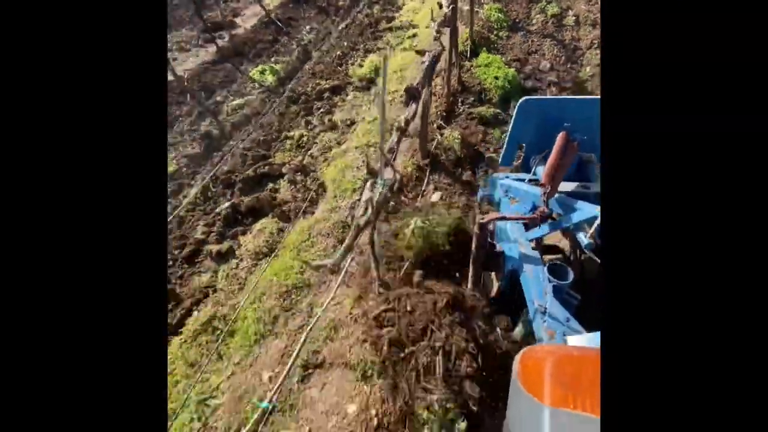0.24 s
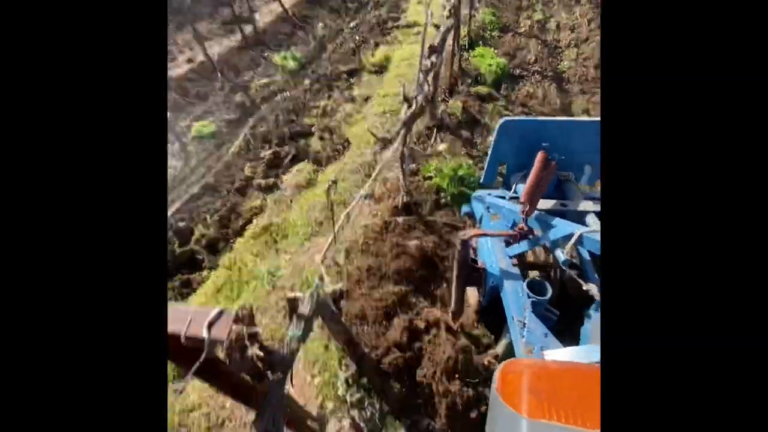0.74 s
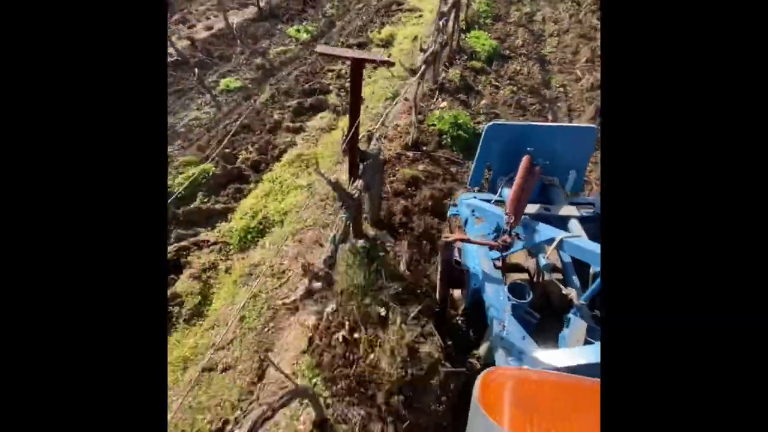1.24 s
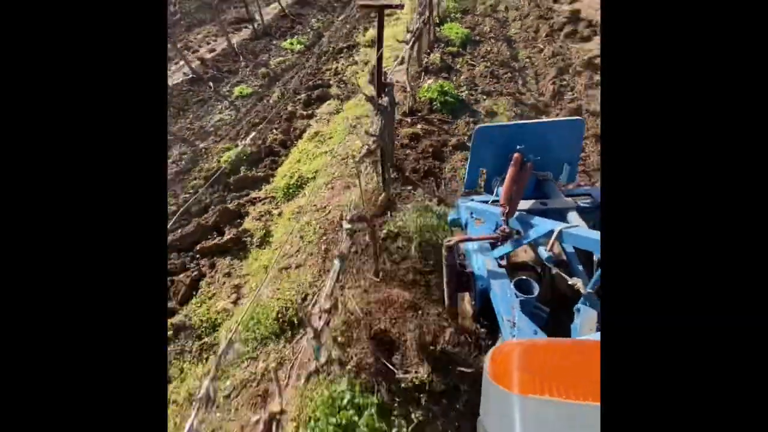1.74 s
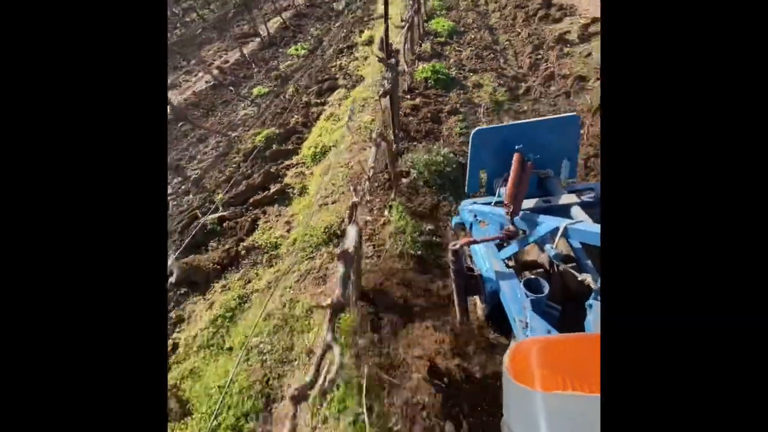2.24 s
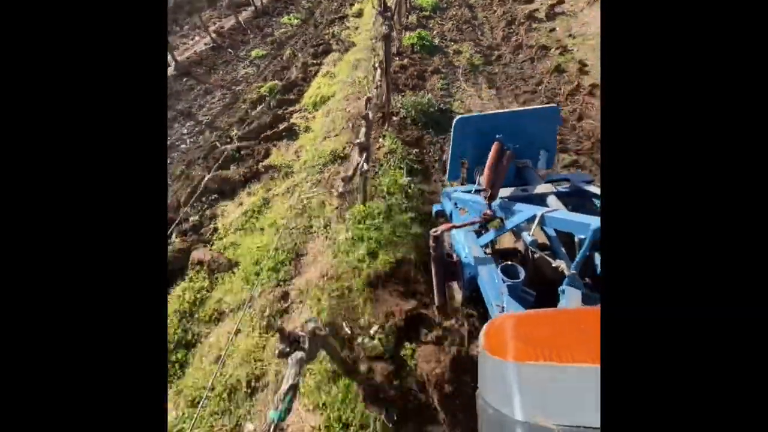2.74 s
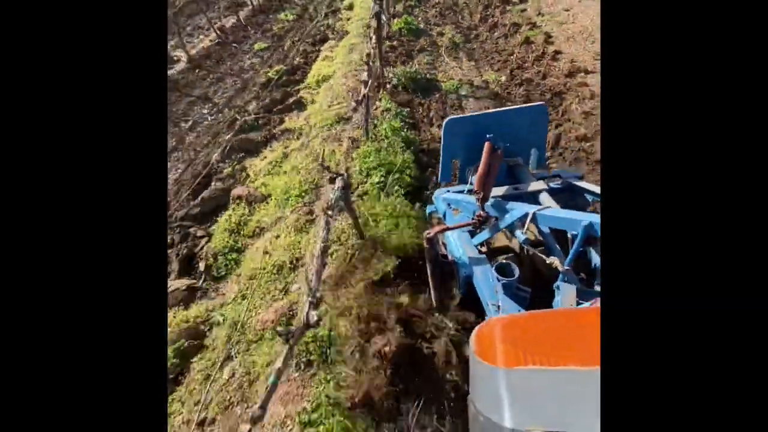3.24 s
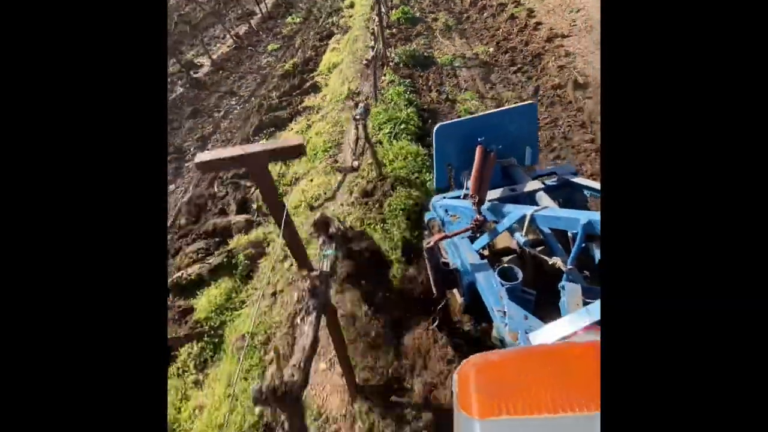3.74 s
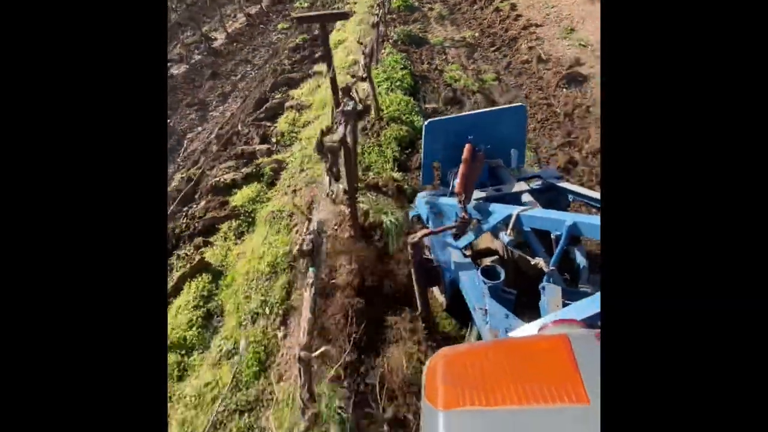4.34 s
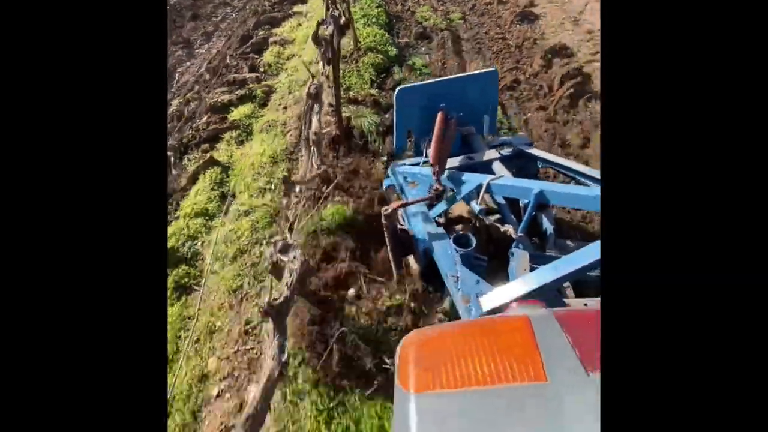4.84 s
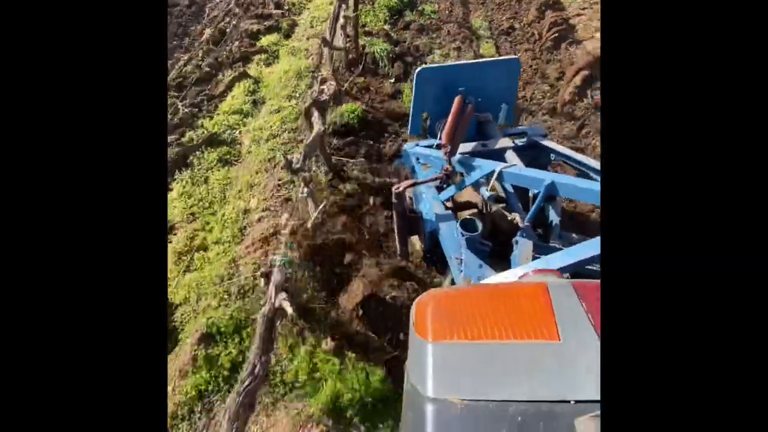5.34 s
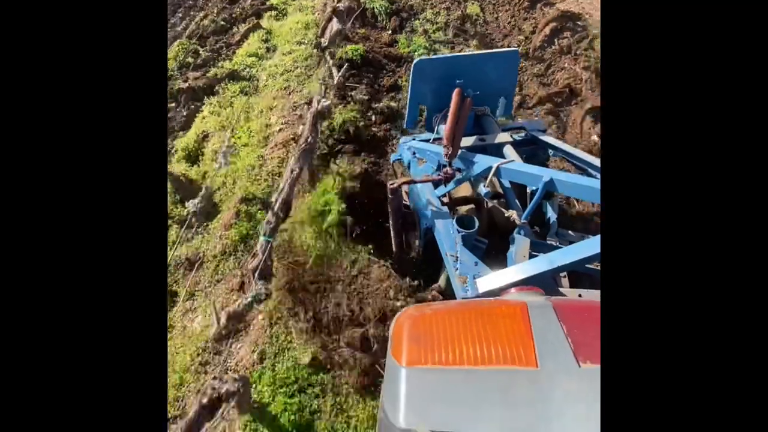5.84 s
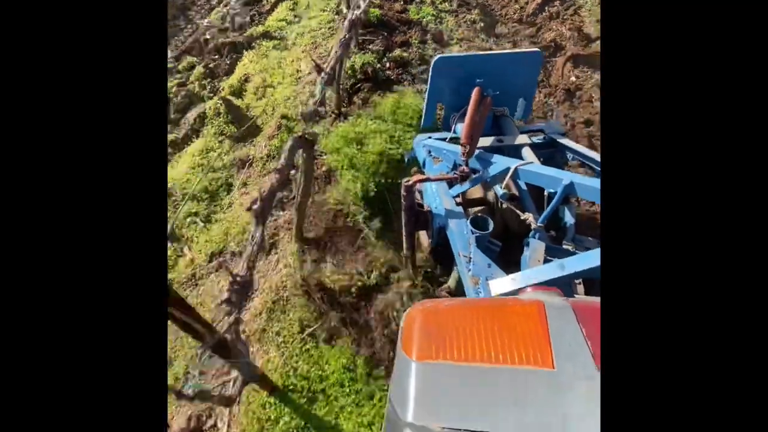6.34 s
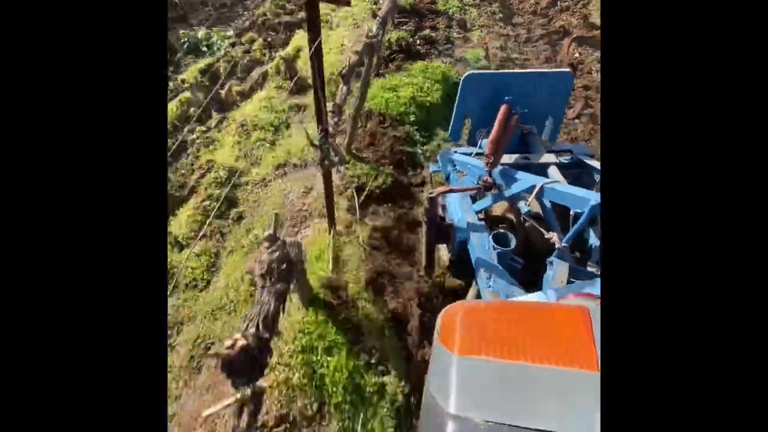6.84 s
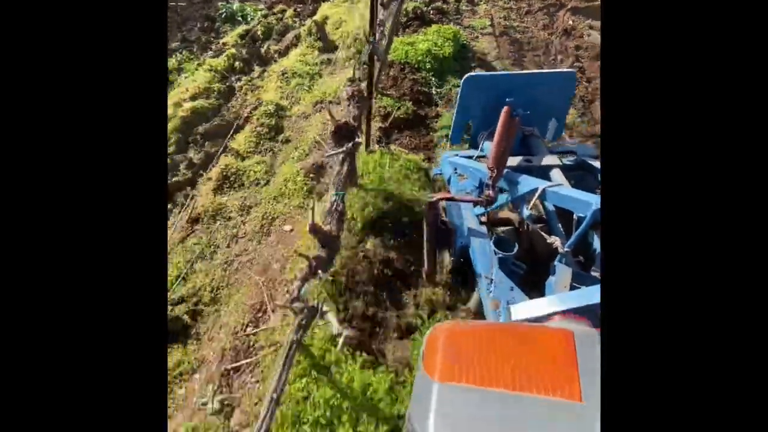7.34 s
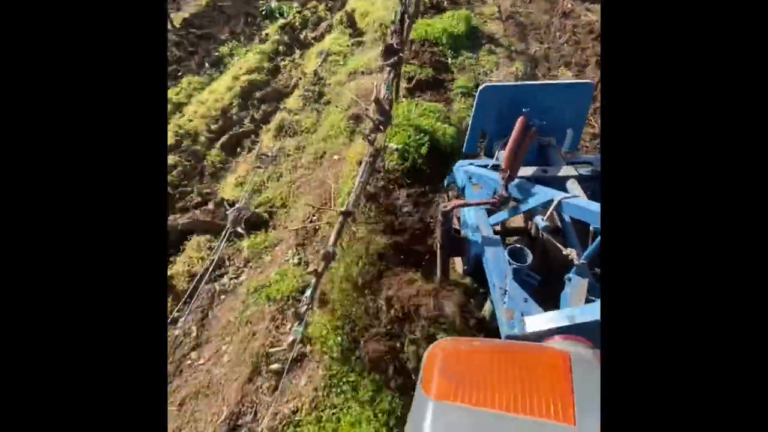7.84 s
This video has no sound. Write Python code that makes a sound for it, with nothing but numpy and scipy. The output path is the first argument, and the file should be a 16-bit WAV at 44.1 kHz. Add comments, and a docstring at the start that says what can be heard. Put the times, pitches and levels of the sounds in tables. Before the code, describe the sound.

A diesel tractor drones and clatters at steady working speed, dragging a harrow through hissing soil with dry metal squeaks, clanks and stone ticks.

```python
"""A three-cylinder diesel tractor at working speed, heard from the seat: crank-locked tones over injector clatter.
It pulls a disc harrow along a vine row. Dry joints squeak as stick-slip tones and the frame clanks in its modes.
Stones tick, clods tumble, and soil hisses off the discs as coloured noise, louder where a disc scrapes.
Just past halfway the listener turns: the engine's colour and direction change."""
import sys
import numpy as np
from scipy import signal
from scipy.fft import rfft, irfft, next_fast_len
from scipy.io import wavfile
from scipy.ndimage import uniform_filter1d, map_coordinates

SR = 44100
rng = np.random.default_rng(int(sys.argv[2]) if len(sys.argv) > 2 else 0)


def file_out(sig):
    """Save sig as 16-bit WAV at sys.argv[1]."""
    # one column per channel
    cols = np.atleast_2d(sig).T
    # limit, then scale
    lim = np.clip(cols, -1, 1)
    pcm = np.round(lim * 32767).astype(np.int16)
    wavfile.write(sys.argv[1], SR, pcm)


N = 356006

# Engine held at working speed, sagging under load and picking up as it eases: (time [s], rate [cycles/s])
CYCLE_RATE = [(0.0, 21.56), (0.2, 21.43), (0.44, 21.5), (1.2, 21.39), (1.44, 21.61), (1.64, 21.47),
              (1.76, 21.54), (1.92, 21.44), (2.12, 21.5), (2.32, 21.42), (2.48, 21.46), (2.64, 21.38),
              (2.92, 21.44), (3.2, 21.2), (3.4, 21.4), (3.72, 21.52), (3.96, 21.36), (4.36, 21.31),
              (4.68, 21.64), (4.88, 21.66), (5.04, 21.73), (5.4, 21.86), (5.72, 21.67), (6.12, 21.78),
              (6.44, 21.63), (6.6, 21.73), (7.04, 21.72), (7.4, 21.92), (7.56, 21.79), (7.72, 21.89),
              (7.88, 21.72), (8.04, 21.72)]
# Engine tones, three firings a cycle: (multiple of cycle rate, level before turn [dB], after [dB])
ENGINE_ORDERS = [(2, -39.5, -36), (3, -21, -19), (4, -33.5, -36.5), (5, -38.5, -46), (6, -35, -32.5),
                 (7, -30, -29.5), (8, -42, -40), (9, -34, -37), (10, -42, -40), (12, -32, -36.5),
                 (13, -40, -48), (14.2, -38, -37), (15, -36, -32), (18, -35.5, -34.5), (19, -42.5, -39),
                 (21, -37, -40), (24, -38.5, -35), (25, -39.5, -36.5), (26, -36.5, -30.5), (27, -37.5, -38),
                 (30, -32.5, -31.5), (32, -39.5, -43), (33, -43, -45), (38, -42.5, -35.5), (40, -44, -47),
                 (45, -40, -33), (52, -52, -40.5), (56, -53, -43), (60, -46, -39), (75, -47, -46),
                 (84, -46, -44), (90, -45.5, -46)]
# Swell of the boom near 150 Hz: (time [s], gain [dB])
BOOM_SWELL = [(0, 0), (1.2, -1.5), (1.6, 2), (2.1, -1.5), (2.6, 2), (3.2, -0.5), (4.2, 0.5), (4.55, 4.5),
              (5, -1.5), (5.5, 1.5), (8.07, 0)]
# Swell of the whine near 645 Hz: (time [s], gain [dB])
WHINE_SWELL = [(0, -2), (.5, 2), (1.1, -10.5), (1.8, -4.5), (2.15, 3.5), (2.7, 1), (3.1, 3), (4, -0.5),
               (4.6, -5), (5.5, -0.5)]
# Engine's mechanical noise: (frequency [Hz], density before turn [dB/Hz], after [dB/Hz]), before trim
ENGINE_ROAR = [(20, -79, -78), (30, -72, -67), (45, -57, -51), (116.3, -45.5, -45), (173.4, -49, -48),
               (300, -51, -50), (555, -54, -49), (736, -56, -53), (955, -58, -55.5), (1128, -57, -57.5),
               (1815, -67.5, -62), (2558, -65.5, -69), (4370, -72, -76), (7480, -79.5, -77.5),
               (8980, -108, -108)]
# Engine cover resonances: (frequency [Hz], width [Hz], lift before turn [dB], after [dB])
COVER_MODES = [(960, 73, 5, 1.5), (1313.8, 18, 2.5, 9), (1590, 55, 2.5, 3), (1927.3, 77, 4.5, 5.5),
               (2225, 90, 1, 0.5)]
# Listener's stance, 0 before the turn, 1 turned furthest, 2 settled (clipped to 0-2): (time [s], stance)
LISTENER_TURN = [(0, 0.121), (4.55, 0.085), (4.92, 0.907), (5.2, 1.13), (5.6, 1.887), (8.07, 2.6)]
# Engine is fuller when faced: (frequency [Hz], gain [dB])
FACING_LIFT = [(100, -0.5), (200, 1.5), (400, 3), (620, -1.5), (900, 3), (1400, -1.5), (2200, -1)]
# Engine direction: (frequency [Hz], left lead in stance 0 [rad], 1 [rad], 2 [rad], coherence [0-1])
ENGINE_BEARING = [(60, 0, -.25, -.15, .97), (170, 0, -1.2, -.25, .93), (250, -.05, -1.7, -.6, .92),
                  (430, -.3, -2.5, -1.6, .85), (600, -1, -3, -2.4, .86), (950, -1.4, -3.3, -2.8, .62),
                  (1650, -6, -4.4, -4.2, .62), (2000, -5.7, -4.7, -4.6, .7), (2800, -3.3, -3.8, -3.8, .5),
                  (7000, -4.1, -4.1, -4.2, .6)]
# Engine coherence while faced: (frequency [Hz], coherence [0-1])
FACING_COHERENCE = [(300, 0.93), (650, 1), (1100, 0.72), (2000, 0.34), (7000, 0.4)]
# Dry joints: (time [s], length [s], pitch [Hz], pitch fall over length [share],
# level [dB], second partial re first [dB])
JOINT_SQUEAKS = [(0.872, 0.0256, 3884, 0, -24.5, -9.5), (0.899, 0.0284, 3840, 0.0125, -28, -17),
                 (1.992, 0.0287, 4968, 0.022, -23.5, -8), (2.02, 0.0293, 4785, 0.0041, -24.5, -12.5),
                 (2.052, 0.0343, 4720, 0.023, -15.5, -21.5), (2.238, 0.096, 3900, 0.0051, -38, -15),
                 (2.492, 0.0363, 4803, 0.021, -9.5, -15), (2.535, 0.0215, 4682, .01, -20, -19),
                 (3.774, 0.0366, 3889, 0.016, -30.5, -9), (3.811, 0.027, 3907, -0.0044, -26.5, -17.5),
                 (3.989, 0.041, 3865, 0.00094, -23.5, -12.5), (4.014, 0.0293, 3861, -0.0057, -15.5, -17),
                 (4.038, .02, 3820, 0.0135, -25, -21), (4.253, 0.044, 5064, .004, -22, -20.5),
                 (4.283, 0.079, 4980, 0.025, -26, -40), (5.183, 0.0535, 4988, 0.015, -23.5, -12),
                 (5.214, 0.0267, 4906, -0.0085, -19.5, -19.5), (5.223, 0.0159, 1370, -.02, -21.5, -26.5),
                 (5.524, 0.0746, 3860, -0.011, -21.5, -1.5), (5.561, 0.047, 3860, -0.0013, -19.5, -16.5),
                 (7.551, 0.028, 4952, 0.0066, -24.5, -12.5), (7.572, 0.0143, 4830, 0.014, -18, -24),
                 (7.587, 0.0166, 4730, 0.0027, -24, -21.5)]
# Dry pivot: (time [s], length [s], pitch [Hz], pitch fall over length [share], level [dB])
PIVOT_CREAKS = [(1.663, 0.04, 799.2, 0.0103, -21.5), (1.677, 0.0317, 784, 0.011, -16),
                (1.708, 0.019, 765.7, .01, -17.5), (1.726, 0.0122, 770.7, .005, -25.5)]
# Creak partials, one per multiple of the pitch: (relative level [dB])
CREAK_PARTIALS_DB = [-9, 0, -13, -18.5, -24, -28]
# Squeak direction, by partial: (frequency [Hz], left lead [rad], left gain [dB])
JOINT_BEARING = [(800, -1.2, 0), (1550, .2, -1), (3870, 1.7, -1), (4900, 2.4, -5), (7700, 2.3, 0),
                 (9000, np.pi, 0), (11000, np.pi, 0), (12000, 2.5, 0)]
# Blows on the frame: (time [s], level [dB], ring [Hz], ring re body [dB], treble re body [dB],
# chatter [s], decay to -60 dB [s])
FRAME_CLANKS = [(.816, -26.5, 1893, -8, -3.5, .011, .06), (.997, -26, 1601, 1, -14, 0.0072, .1),
                (1.054, -18.5, 1424, 3.5, -21, .006, 0.059), (1.423, -22, 1814, -7.5, -9, .012, .097),
                (2.238, -22, 1493, -0.5, -6.5, 0.0088, .12), (3.016, -24.5, 3280, 4, -0.5, 0.015, 0.11),
                (3.045, -19.5, 3038, 5, -10, .013, 0.05), (3.9795, -11, 2260, 0.5, -19, 0.0072, 0.059),
                (4.099, -21.5, 2168, -2, -9.5, 0.005, 0.084), (4.124, -22, 2313, -3, -7.5, .014, .12),
                (4.15, -19, 2306, 0.5, -16, .004, 0.048), (4.788, -20, 2120, -6.5, -5.5, .01, .091),
                (4.919, -20, 1522, 0, -19, .004, 0.076), (5.919, -22.5, 1920, 3.5, -16.5, .008, 0.066),
                (6.0, -20, 1624, 6.5, -27, .004, .045), (6.049, -13.5, 2013, -1, -8, 0.0102, .05),
                (8.015, -12, 3462, 1.5, -5, 0.0094, .055)]
# Harrow frame modes: (frequency [Hz], mean level [dB])
FRAME_MODES = [(1150, -10), (1450, -3), (1860, -5.5), (2290, -10.5), (2800, -3), (3370, -10.5), (3810, -11),
               (4280, -16)]
# Stones flicked against the discs: (time [s], level before trim [dB], ring [Hz],
# decay to -60 dB [s], ring lift [dB])
STONE_TICKS = [(0.154, -15.5, 5200, .045, 6.5), (0.5196, -18, 6000, .051, 9),
               (.815, -21.5, 5810, 0.044, 11.5), (1.2286, -19, 5995, 0.03, 17),
               (1.8302, -14.5, 5690, .03, 4.5), (2.163, -22.5, 7440, 0.035, 4),
               (2.521, -18.5, 6990, 0.05, 11), (3.045, -17, 6066, 0.085, 23.5),
               (3.744, -21, 7340, .029, 10), (4.0363, -21.5, 7730, .015, 4), (4.347, -20, 7375, .11, 18),
               (6.095, -16, 5610, 0.04, 9.5), (8.016, -18.5, 7280, 0.067, 14)]
# Harrow direction, opposed near 10 kHz: (frequency [Hz], left lead [rad], coherence [0-1])
HARROW_DIRECTION = [(300, -.3, .8), (900, -1.7, .5), (1700, -5.6, .55), (2300, -5.2, .5), (2900, -3.3, .5),
                    (5000, -3.4, .55), (6300, -4.3, .65), (7500, -4, .72), (8400, -np.pi, .96),
                    (9500, -np.pi, 1), (11200, -np.pi, 1), (12500, -3, .65), (13700, -2.4, .5),
                    (15200, -.3, .5)]
# Harrow raised on the right and lowered on the left by: (frequency [Hz], gain [dB])
HARROW_RIGHT_BIAS = [(2000, 0), (4500, 1.4), (6500, 1.1), (8000, 0)]
# Steady soil flow, following disc depth: (time [s], level [dB])
SOIL_FLOW = [(0, -34), (.8, -39.5), (1.6, -42.5), (2.4, -45), (3.5, -49), (3.85, -36.5), (4.8, -41.5),
             (5.75, -45), (6.45, -45.5), (7.1, -42), (8.07, -43)]
# Colour of soil on steel: (frequency [Hz], relative level [dB])
SOIL_COLOUR = [(1000, -9), (3000, -.5), (5000, -1), (7000, 0), (8300, .5), (11500, -.5), (13000, -2.5),
               (15500, -6)]
# Disc resonances: (frequency [Hz], width [Hz], lift [dB])
DISC_MODES = [(3450, 250, 3), (6080, 220, 5), (6900, 300, 2), (7420, 180, 5), (7750, 100, 2)]
# A disc bites into firmer ground: (time [s], rise [s], hold [s], level [dB],
# release to -60 dB [s], fizz above 10 kHz re rub [dB])
DISC_SCRAPES = [(1.161, .02, 0.026, -36.5, 1.5, -10), (2.039, .02, .024, -29, 0.19, -1.5),
                (4.08, 0.018, .018, -39, 5.5, 7.5), (4.299, 0.054, .025, -25, 0.63, 6.5),
                (4.746, .02, .023, -34, 0.54, 2.5), (5.213, .05, 0.116, -29.5, 0.89, 1),
                (5.435, .02, 0.057, -33, 0.02, -5), (7.56, 0.023, 0.024, -30, 1, -3.5)]
# Harder rubbing favours these disc modes: (frequency [Hz], width [Hz], lift [dB])
SCRAPE_MODES = [(6077, 480, 7.5), (7270, 1200, 7), (3300, 890, 0.5)]
# How heavily the clods tumble: (time [s], level [dB])
CLOD_LEVEL = [(0, -36), (1.3, -34.5), (2.95, -36.5), (3.07, -28.5), (3.3, -36), (4.6, -31), (5.4, -33),
              (6.7, -32.5), (7.2, -32.5), (8.07, -30.5)]

BOOM_ORDER, WHINE_ORDER = 7, 30
HUNT_SHARE, HUNT_KNOTS_PER_S = 0.0003, 3.323  # random speed drift
SQUEAK_TAIL_DB, SQUEAK_TAIL_T60_S = -13.5, 0.088
MODE_BLUR_RAD, MODE_DETUNE_SHARE = .6, .005  # phase scatter in a ring; pitch scatter between blows
TOP_HZ = 15900


def crank():
    """Engine cycles turned so far, two revolutions to a cycle."""
    drift = 1 + HUNT_SHARE * wobble(HUNT_KNOTS_PER_S)
    return np.cumsum(curves(CYCLE_RATE)[0] * drift) / SR


def drone(cycle, stances, waver_base_db=0.8, waver_db_per_order=0.07, waver_max_db=3.0):
    """Exhaust and gear tones locked to the crank; higher orders waver and sway more, boom and whine swell."""
    out = np.zeros((2, N))
    shaft_rad = 2 * np.pi * cycle + .004 * wobble(14)
    sway_rad = .01 * wobble(2.5)
    swells_db = {BOOM_ORDER: curves(BOOM_SWELL)[0], WHINE_ORDER: curves(WHINE_SWELL)[0]}
    for order, before_db, after_db in ENGINE_ORDERS:
        mean_hz = order * cycle[-1] * SR / N
        lead = np.array(along(ENGINE_BEARING, mean_hz)[:-1]) @ stances + order * sway_rad
        faced_db = after_db + along(FACING_LIFT, mean_hz)[0]
        level_db = np.array([before_db, faced_db, after_db]) @ stances
        waver_db = min(waver_base_db + waver_db_per_order * order, waver_max_db) * wobble(10)
        waver_db = waver_db + swells_db.get(order, 0)
        phase = order * shaft_rad + .003 * order * wobble(18) + rng.uniform(0, 2 * np.pi)
        tone = np.sin([phase + lead / 2, phase - lead / 2])
        out += np.sqrt(2) * amp(level_db + waver_db) * tone
    return out


def clatter(cycle, stances, repeat=0.54, fresh=0.849, limp_db=-0.2341, uneven_db=1.7072, trim_db=-1.0463):
    """Block and injectors rattle the covers: one noise part repeats every cycle, the rest is new."""
    pattern = unit(irfft(np.exp(2j * np.pi * rng.random((2, 1025)))))
    place = cycle % 1 * pattern.shape[1]
    locked = np.array([map_coordinates(p, [place], order=3, mode="grid-wrap") for p in pattern])
    locked_colour = [(200, -26.5), (550, -5.5), (1000, -1.5), (1900, 1.0), (3500, -20.5)]  # (Hz, dB)
    locked = filtered(locked, lambda hz: amp(along(locked_colour, hz)[0]))
    # one slight limp per cycle, plus random unevenness
    force = unit(amp(limp_db * np.cos(2 * np.pi * cycle) + uneven_db * wobble(65)))
    rattle = force * (fresh * rng.standard_normal((2, N)) + repeat * locked)

    def coloured(side):
        covers = [(hz, width, lifts[side]) for hz, width, *lifts in COVER_MODES]
        return filtered(rattle, lambda hz: amp(along(ENGINE_ROAR, hz)[side] + lifted(covers, hz)))

    before, after = coloured(0), coloured(1)
    mixed = after + stances[0] * (before - after)
    density_to_rms = np.sqrt(SR / 2)
    return amp(trim_db) * density_to_rms * turning(mixed, stances, patchy_db=3.0)


def turning(pair, stances, patchy_db):
    """Place noise left and right by phase and coherence as the listener turns; colour shifts in random patches."""
    hz, t, z = signal.stft(pair, SR, nperseg=1024)
    share = stances[:, np.minimum((t * SR).astype(int), N - 1)]
    *leads, alike = along(ENGINE_BEARING, hz)
    lead = np.transpose(leads) @ share
    alike = alike[:, None] + np.outer(along(FACING_COHERENCE, hz)[0] - alike, share[1])
    angle = np.arccos(np.clip(alike, 0, 1)) / 2
    patches = uniform_filter1d(rng.standard_normal(lead.shape), size=6, axis=0)
    patches = unit(uniform_filter1d(patches, size=7, axis=1))
    patch_db = patchy_db * patches * (hz / (hz + 500))[:, None]
    z = z * amp(np.outer(along(FACING_LIFT, hz)[0], share[1]) + patch_db)
    shared, apart = z[0] * np.cos(angle), z[1] * np.sin(angle)
    left = (shared + apart) * np.exp(.5j * lead)
    right = (shared - apart) * np.exp(-.5j * lead)
    return signal.istft([left, right], nperseg=1024)[1][:, :N]


def squeaks():
    """Nearly pure squeaks from the joints, a rougher creak from a pivot; the frame rings on after each."""
    out = np.zeros((2, N))
    for s, length_s, hz, fall, db, second_db in JOINT_SQUEAKS:
        partials_db = db + np.array([0, second_db, second_db - 14])
        add(out, s, slip(length_s, hz, fall, partials_db, rough_db=2.5, pitch_jitter=0.00394))
    for s, length_s, hz, fall, db in PIVOT_CREAKS:
        creak = slip(length_s, hz, fall, CREAK_PARTIALS_DB, rough_db=1.5, pitch_jitter=0.0071)
        add(out, s, amp(db) * creak)
    t = np.arange(SR // 5) / SR
    tail = rng.standard_normal((1, len(t))) * np.exp(-np.log(1000) * t / SQUEAK_TAIL_T60_S)
    tail = unit(tail) / np.sqrt(len(t))  # unit energy
    return out + amp(SQUEAK_TAIL_DB) * signal.fftconvolve(out, tail, axes=1)[:, :N]


def slip(length_s, hz, fall, partials_db, rough_db, pitch_jitter, ring_s=0.00327):
    """Steel sticks and slips at one of its resonances, glides in pitch and rings out."""
    u = np.minimum(np.arange(round((length_s + 10 * ring_s) * SR)) / (length_s * SR), 1)
    pitch_hz = hz * (1 + fall * (.5 - u) + pitch_jitter * wobble(367, size=len(u)))
    phase = 2 * np.pi * np.cumsum(pitch_hz) / SR
    keep = np.exp(-1 / (ring_s * SR))
    swell = signal.lfilter([1 - keep], [1, -keep], np.sin(np.pi * u ** 0.734))
    swell = swell * amp(rough_db * wobble(308.5, size=len(u)))
    tone = 0
    for k, db in enumerate(partials_db, 1):
        lead, left_db = along(JOINT_BEARING, k * hz)
        left = amp(left_db) * np.sin(k * phase + lead)
        tone = tone + amp(db) * np.array([left, np.sin(k * phase)])
    return np.sqrt(2) * swell * tone


def knocks(rise_s=0.00033, mode_scatter_db=5.0, stone_trim_db=-3, stone_width_hz=800):
    """Loose links chatter into the frame's modes, each blow favouring one; stones tick brightly on the discs."""
    out, t = np.zeros((2, N)), np.arange(SR // 4) / SR
    treble_colour = [(1500, -34.5), (4000, 13), (6500, 6.5), (15000, -22)]  # (Hz, dB)

    def burst(response):
        return unit(filtered(rng.standard_normal((2, len(t))), response))

    def bright(f):
        return amp(along(treble_colour, f)[0])

    def mode(hz):
        blur = MODE_BLUR_RAD * wobble(330, size=len(t))
        quadrature = np.array([[0], [np.pi / 2]])
        return np.sqrt(2) * np.sin(2 * np.pi * (hz * t + rng.random()) + blur + quadrature)

    for s, db, ring_hz, ring_db, treble_db, chatter_s, t60_s in FRAME_CLANKS:
        body = np.zeros((2, len(t)))
        for mode_hz, mode_db in FRAME_MODES:
            gain = amp(mode_db + mode_scatter_db * rng.normal())
            body += gain * mode(mode_hz * (1 + MODE_DETUNE_SHARE * rng.normal()))
        envelope = (1 - np.exp(-t / rise_s)) * amp(db - 60 * np.maximum(t - chatter_s, 0) / t60_s)
        blow = unit(body) + amp(ring_db) * mode(ring_hz) + amp(treble_db) * burst(bright)
        add(out, s, envelope * unit(blow))
    for s, db, ring_hz, t60_s, ring_db in STONE_TICKS:
        ring = [(ring_hz, stone_width_hz, ring_db)]
        tick = burst(lambda f: f ** 2 / (f ** 2 + 3000 ** 2) * amp(lifted(ring, f)))
        add(out, s, tick * amp(stone_trim_db + db - 60 * t / max(t60_s, .004)))
    return ports(out, lambda hz: (1, *along(HARROW_DIRECTION, hz)))


def clods(stances, lump_db=2.5):
    """Turned clods tumble against the frame: dull noise in uneven lumps."""
    colour = [(100, -35.0), (350, -2), (800, -5.5), (1300, -6.5), (2400, -10.0), (4000, -20.0),
              (8000, -67.5)]  # (Hz, dB)
    lumps = rng.standard_normal((2, N)) * amp(lump_db * np.tanh(wobble(90)))
    dull = filtered(lumps, lambda hz: amp(along(colour, hz)[0]))
    return amp(curves(CLOD_LEVEL)[0]) * unit(turning(dull, stances, patchy_db=3.5))


def soil(uneven_db=2.4):
    """Earth slides over the discs all the time, and louder wherever one bites."""
    sliding = amp(curves(SOIL_FLOW)[0] + uneven_db * wobble(18))
    rub = earth(DISC_MODES + SCRAPE_MODES, clump_db=3.5, grit=0.34)
    fizz = filtered(rub, lambda hz: hz > 10000)
    rub_gain, fizz_gain = scraping()
    steady = sliding * earth(DISC_MODES, clump_db=2.5, grit=0.45)
    return steady + rub_gain * (rub - fizz) + fizz_gain * fizz


def scraping():
    """Gain of the scrapes and of their fizz: each swells, holds and dies away; powers add."""
    t, power = np.arange(N) / SR, np.zeros((2, N))
    for s, rise_s, hold_s, db, t60_s, fizz_db in DISC_SCRAPES:
        attack = np.clip((t - s) / rise_s, 0, 1)
        released_s = np.maximum(t - s - rise_s - hold_s, 0)
        release = np.exp(-np.log(1000) * released_s / t60_s)
        power += (amp([[db], [db + fizz_db]]) * attack * release) ** 2
    return np.sqrt(power)


def earth(modes, clump_db, grit, grains_per_s=900):
    """Hiss of earth on ringing steel, in clumps, with sharp grains of grit in it; rms 1."""
    struck = rng.random(N) < grains_per_s / SR
    grains = rng.standard_normal((2, N)) * rng.exponential(1, N) * struck
    flow = (rng.standard_normal((2, N)) + grit * unit(grains)) * amp(clump_db * wobble(64))

    def response(hz):
        gain = amp(along(SOIL_COLOUR, hz)[0] + lifted(modes, hz))
        return gain, *along(HARROW_DIRECTION, hz)

    return unit(ports(flow, response))


def lifted(modes, hz):
    """dB that a set of (centre [Hz], width [Hz], lift [dB]) resonances adds."""
    return sum(db / (1 + (2 * (hz - centre) / width) ** 2) for centre, width, db in modes)


def ports(pair, response):
    """Mix two signals to left and right; response gives (gain, left lead [rad], coherence) by frequency."""
    m = next_fast_len(N + 8192)
    gain, lead, alike = response(np.fft.rfftfreq(m, 1 / SR))
    angle = np.arccos(np.clip(alike, 0, 1)) / 2
    shared, apart = rfft(pair, m) * gain * np.array([np.cos(angle), np.sin(angle)])
    left = (shared + apart) * np.exp(.5j * lead)
    right = (shared - apart) * np.exp(-.5j * lead)
    return irfft([left, right], m)[:, :N]


def filtered(x, response):
    """x through a response given as a function of Hz."""
    m = next_fast_len(x.shape[-1] + 8192)
    return irfft(rfft(x, m) * response(np.fft.rfftfreq(m, 1 / SR)), m)[..., :x.shape[-1]]


def wobble(knots_per_s, size=N):
    """A smooth random curve through normally distributed knots."""
    coarse = np.arange(0, size + 64, 64)
    knots = rng.standard_normal(int(size * knots_per_s / SR) + 4)
    smooth = map_coordinates(knots, [coarse * knots_per_s / SR], mode="nearest")
    return np.interp(np.arange(size), coarse, smooth)


def along(rows, hz):
    """Each column of a (Hz, ..) table, read on a log axis."""
    f, *cols = np.transpose(rows)
    return [np.interp(np.log(hz + 1), np.log(f + 1), c) for c in cols]


def curves(rows):
    """Each column of a (s, ..) table, one value per sample."""
    s, *cols = np.transpose(rows)
    return [np.interp(np.arange(N) / SR, s, c) for c in cols]


def add(track, s, sound):
    """Mix a sound into a track at time s."""
    part = track[..., max(round(s * SR), 0):][..., :sound.shape[-1]]
    part += sound[..., :part.shape[-1]]


def amp(db):
    """Decibels to gain."""
    return np.exp(np.asarray(db) * np.log(10) / 20)


def unit(x):
    """Scale to rms 1."""
    return x / np.sqrt(np.mean(x ** 2) + 1e-20)


def scene():
    """The engine, a little to the left until the turn, and the harrow, brighter on the right."""
    cycle = crank()
    turn = np.clip(curves(LISTENER_TURN)[0], 0, 2)
    stances = np.maximum(1 - np.abs(turn - np.arange(3)[:, None]), 0)  # weights, sum 1
    left_tilt = amp(0.5 * stances[0] * np.array([[1], [-1]]))
    engine = (drone(cycle, stances) + clatter(cycle, stances)) * left_tilt

    def right_tilt(hz):
        return amp(np.array([[-1], [1]]) * along(HARROW_RIGHT_BIAS, hz)[0])

    harrow = filtered(knocks() + clods(stances) + soil(), right_tilt)
    return engine + squeaks() + harrow


def record(dry):
    """Nothing is kept above the band limit."""
    return filtered(dry, lambda hz: hz < TOP_HZ)


dry = scene()
out = record(dry)
file_out(out)
```